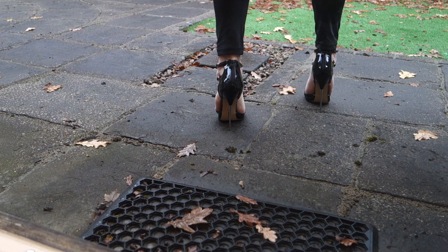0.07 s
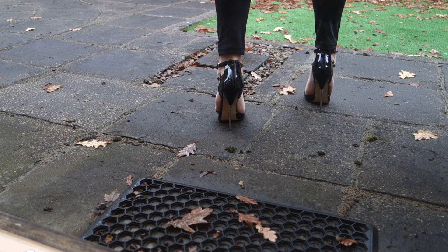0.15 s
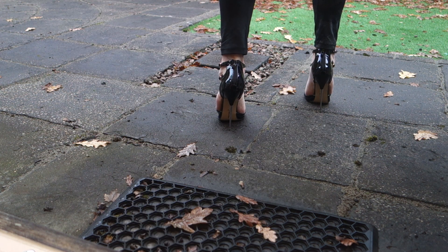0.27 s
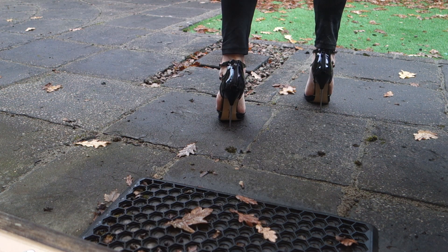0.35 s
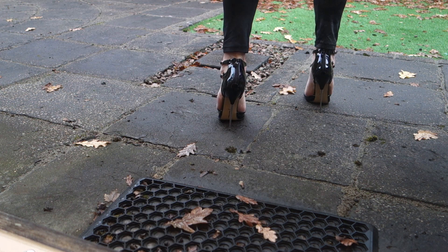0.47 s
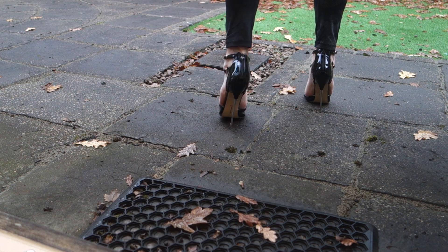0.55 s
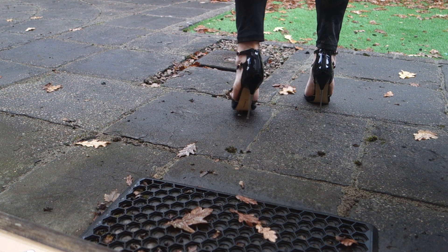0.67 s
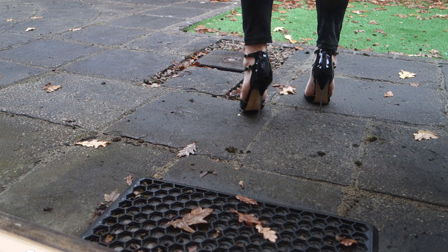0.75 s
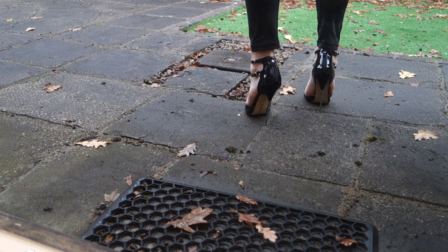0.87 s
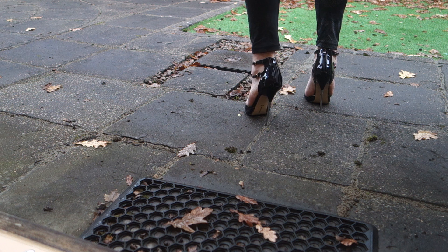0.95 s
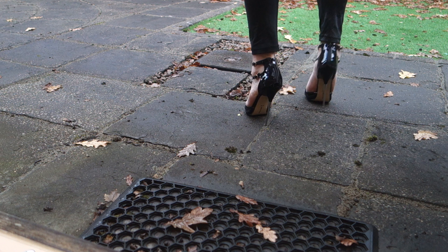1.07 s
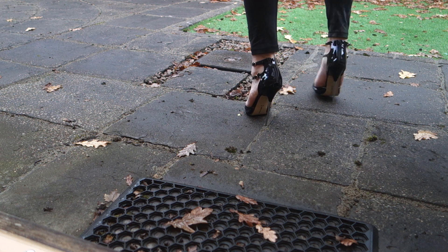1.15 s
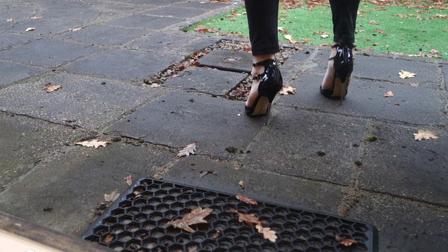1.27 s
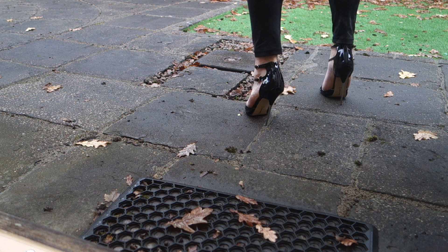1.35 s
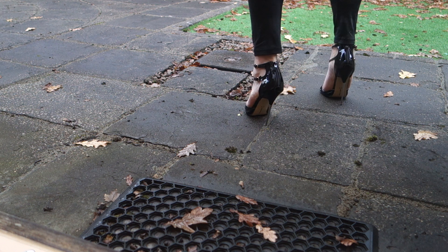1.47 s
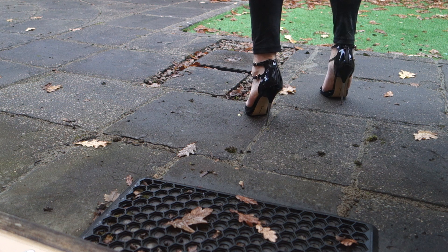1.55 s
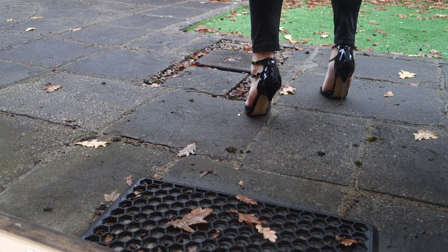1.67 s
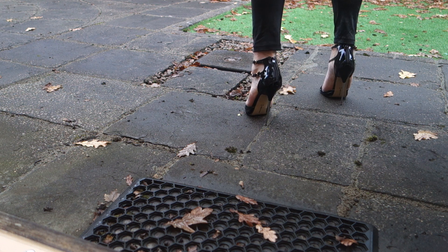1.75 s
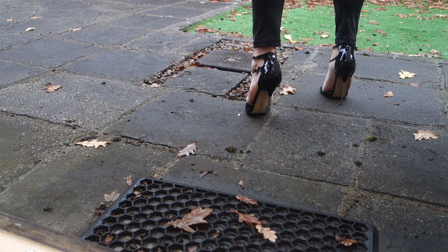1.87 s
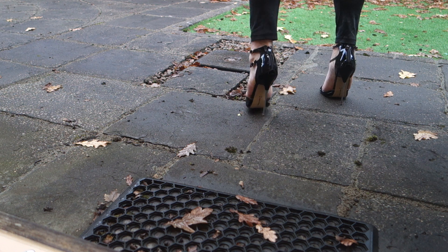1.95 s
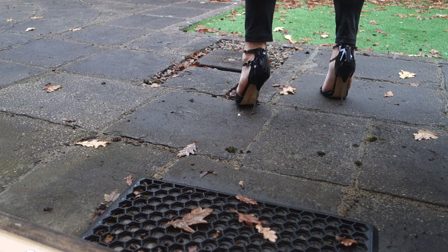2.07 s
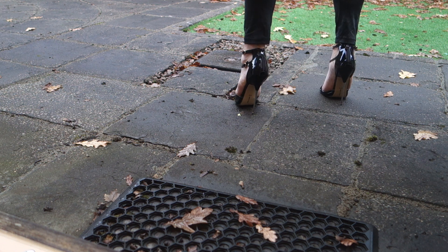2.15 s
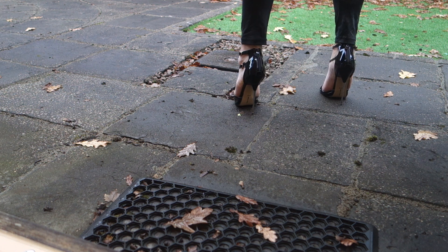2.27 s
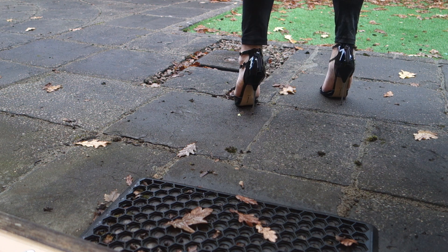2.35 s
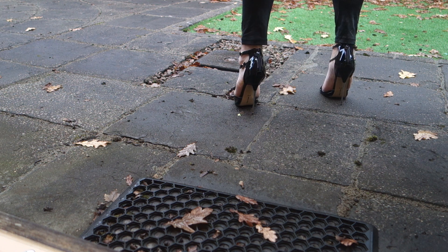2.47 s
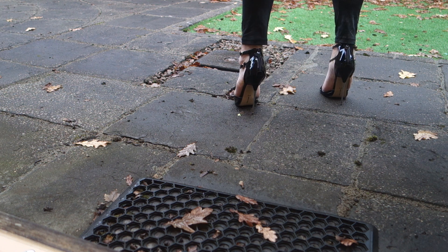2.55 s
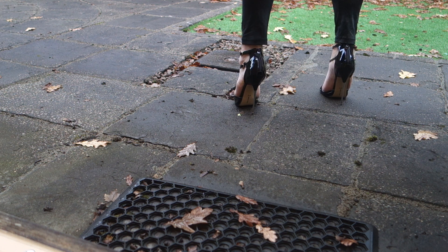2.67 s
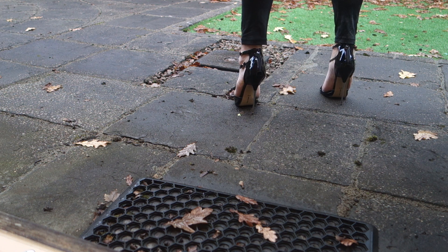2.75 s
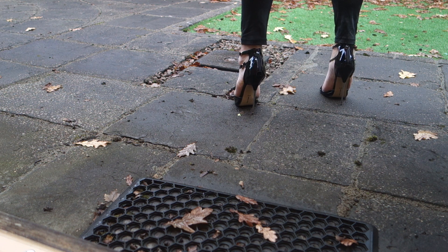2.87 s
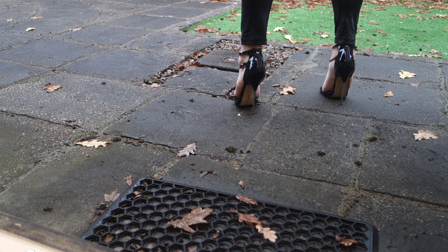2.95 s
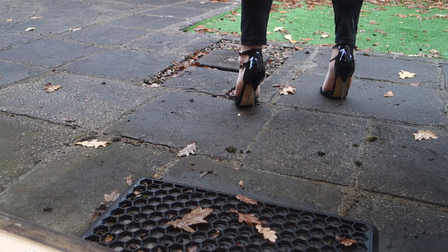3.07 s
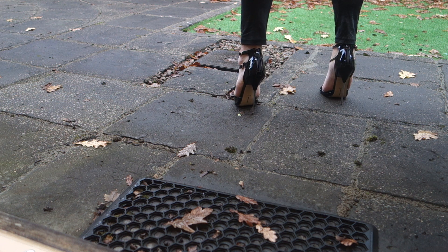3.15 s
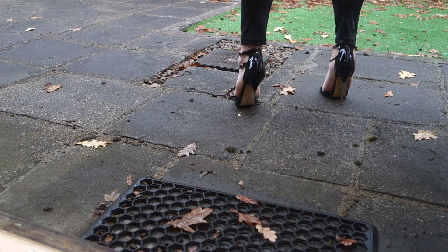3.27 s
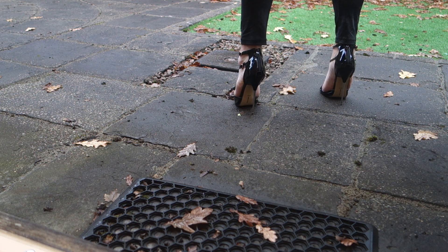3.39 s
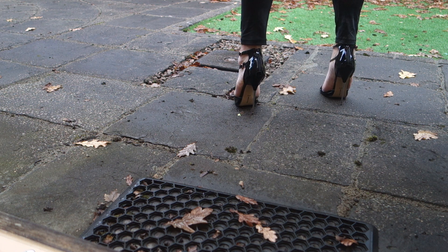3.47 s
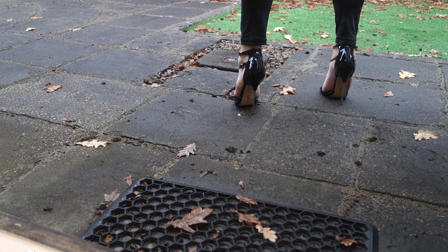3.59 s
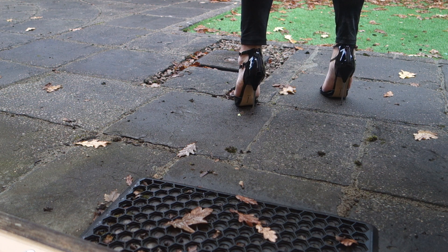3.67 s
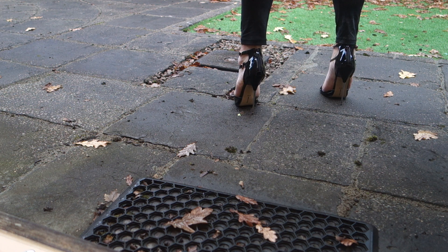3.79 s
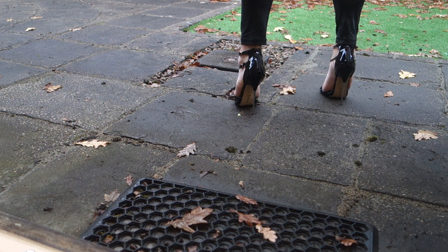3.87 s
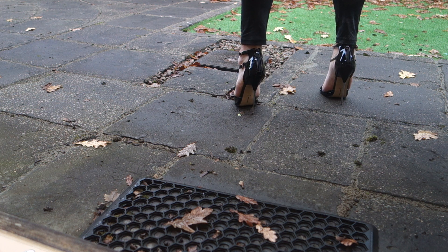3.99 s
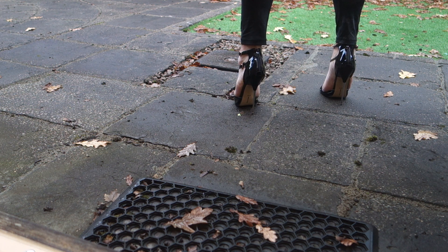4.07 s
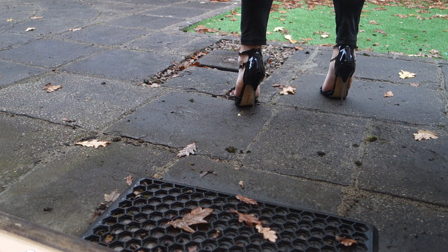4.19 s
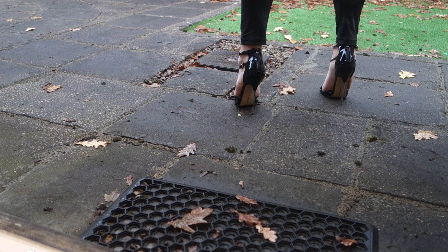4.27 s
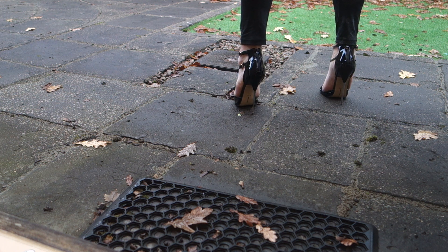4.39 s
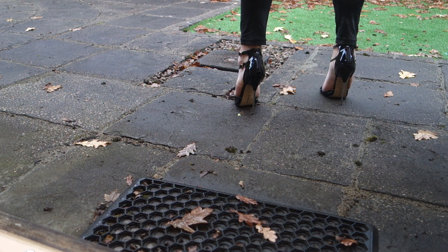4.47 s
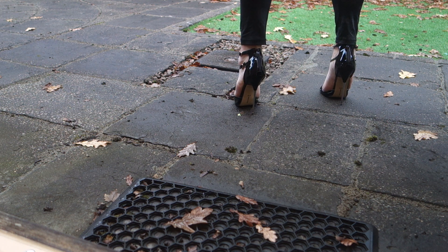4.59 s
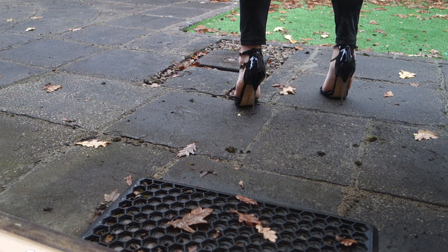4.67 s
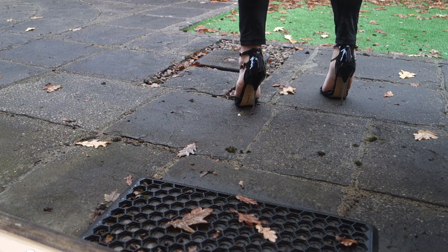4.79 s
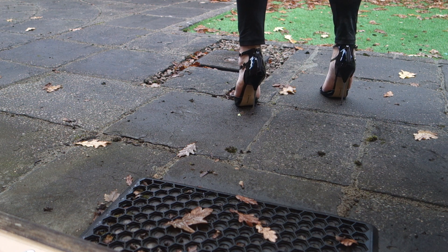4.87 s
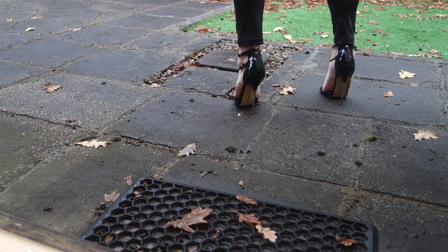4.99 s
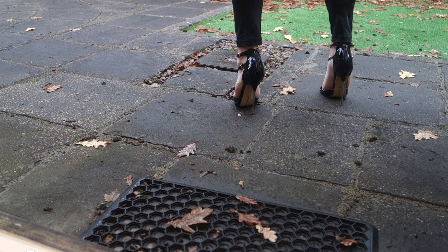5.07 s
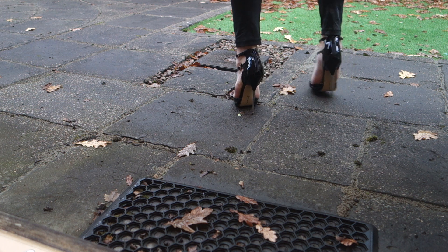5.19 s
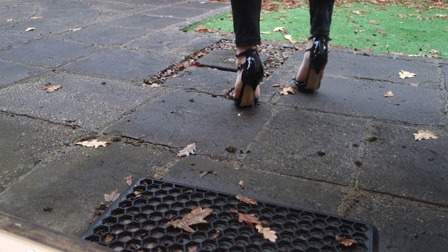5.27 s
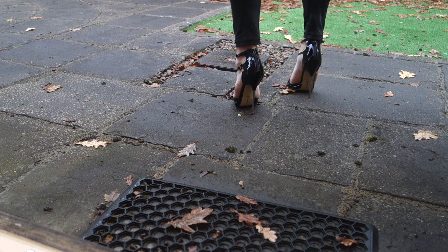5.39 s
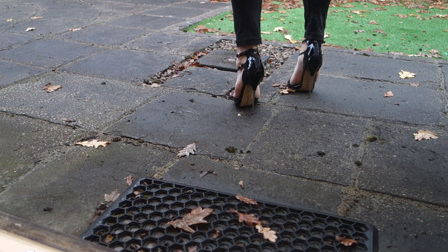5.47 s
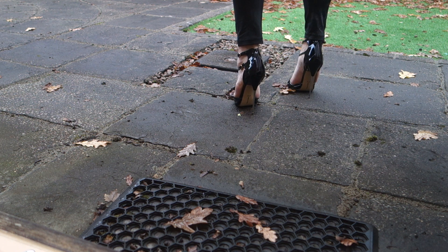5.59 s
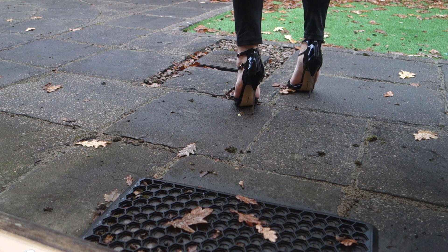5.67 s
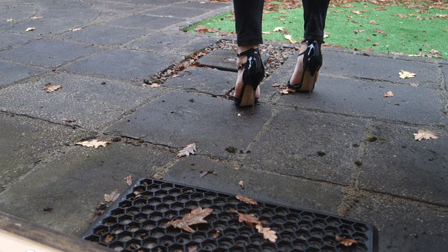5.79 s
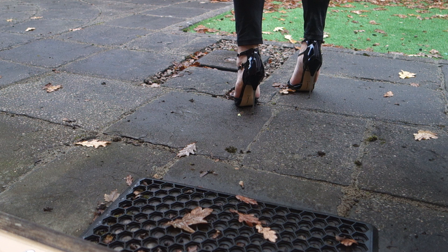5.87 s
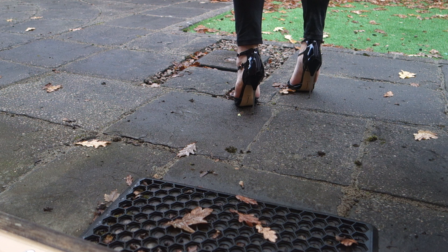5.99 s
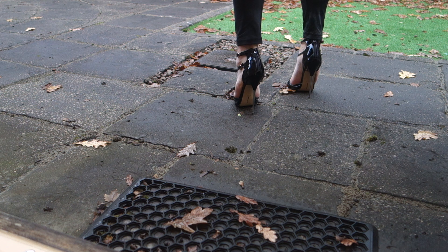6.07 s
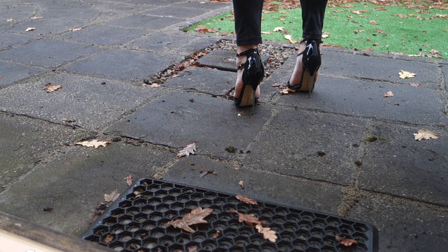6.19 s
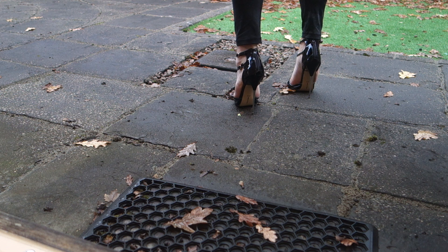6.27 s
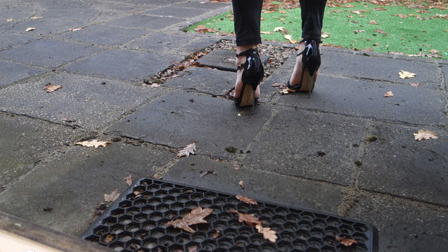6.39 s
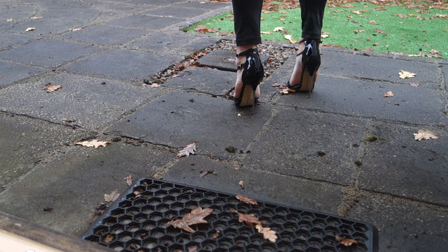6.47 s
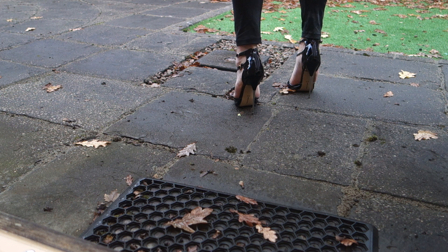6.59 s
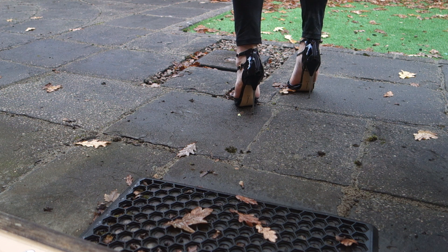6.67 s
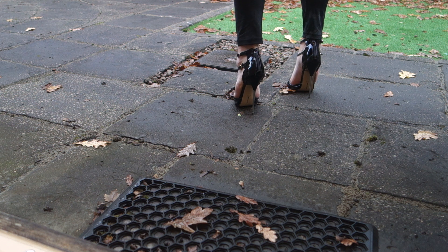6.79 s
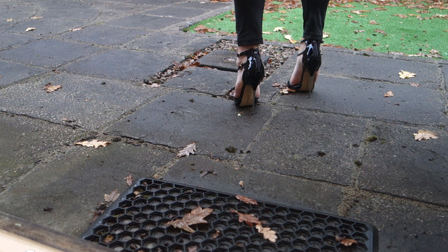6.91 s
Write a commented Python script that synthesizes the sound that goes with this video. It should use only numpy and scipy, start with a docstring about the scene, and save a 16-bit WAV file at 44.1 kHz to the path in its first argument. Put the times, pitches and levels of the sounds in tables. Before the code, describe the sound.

Stiletto heels shuffle, click and scrape on gritty concrete slabs in a walled yard, pause over faint traffic murmur, then step again briefly.

```python
"""Stiletto heels on gritty slabs

Stiletto heels shift about on concrete slabs in a walled yard, a little way from the microphone.
Heel tips and shanks rattle as short modes, soles slap, grit snaps and scrapes as filtered grains;
the walls throw it all back through sparse decaying echo taps. Shaped noise makes the distant traffic
murmur, under a wavering hum, a fuzzy drone and soft thumps; small far birds whistle in gliding tones."""
import sys
import numpy as np
from scipy import signal
from scipy.fft import rfft, irfft
from scipy.io import wavfile
from scipy.ndimage import uniform_filter1d

SR = 44100
rng = np.random.default_rng(int(sys.argv[2]) if len(sys.argv) > 2 else 0)


def file_out(sig):
    """Save sig as 16-bit WAV at sys.argv[1]."""
    # one column per channel
    cols = np.atleast_2d(sig).T
    # limit, then scale
    lim = np.clip(cols, -1, 1)
    pcm = np.round(lim * 32767).astype(np.int16)
    wavfile.write(sys.argv[1], SR, pcm)


N = 306054
CONTACT_MS = 3.83  # how long a direct blow rattles


def amp(db):
    """Decibels to gain."""
    return 10 ** (np.asarray(db) / 20)


def evened(x):
    """Scales to rms 1."""
    return x / np.sqrt(np.mean(x ** 2) + 1e-20)


def peaked(x):
    """Scales to peak 1."""
    return x / (abs(x).max() + 1e-12)


def levelled(x):
    """Scales a short sound to the energy of rms 1 over two and a half milliseconds."""
    return x * np.sqrt(SR / 400) / np.linalg.norm(x)


def read_curve(points, hz):
    """Reads a curve of values over pitch, interpolated on a log-frequency axis."""
    point_hz, value = np.transpose(points)
    return np.interp(np.log(hz + 1), np.log(point_hz + 1), value)


def add(mix, start_s, sound):
    """Mixes a sound in at start_s, cutting what runs past the end."""
    part = mix[..., max(round(start_s * SR), 0):][..., :sound.shape[-1]]
    part += sound[..., :part.shape[-1]]


def placed(sound, pan_db):
    """Leans a sound to the left (positive) or right by a level difference between the ports."""
    return sound * amp([[pan_db / 2], [-pan_db / 2]])


def resonate(x, hz, width_hz):
    """A resonance of gain 1: shifts hz down to zero, smooths, and shifts back."""
    turn = np.exp(2j * np.pi * np.cumsum(hz * np.ones(len(x))) / SR)
    decay = np.exp(-np.pi * width_hz / SR)
    smooth = signal.lfilter([1 - decay], [1, -decay], x / turn)
    return 2 * (turn * smooth).real


def treble(x):
    """Keeps the fizz above 6 kHz."""
    return signal.sosfilt(signal.butter(4, 6000, "high", fs=SR, output="sos"), x)


def ports(z, other, likeness, hz):
    """Spectra at two microphone ports: partly alike, the left one a little late."""
    lag_s = 1.5 / SR
    same = np.clip(read_curve(likeness, hz), 0, 1)[:, None]
    left = z * np.exp(-2j * np.pi * hz * lag_s)[:, None]
    right = same * z + np.sqrt(1 - same ** 2) * other
    return np.array([left, right])


def murmur():
    """Far traffic and microphone hiss: random spectra with slight drifting patches."""
    # murmur colour before levelling: pitch_hz, relative_level_db (per Hz)
    colour = [(12, -31), (20, -7), (42, -10.5), (70, 1), (184, -4.5), (248, -2.5), (510, -6), (722, -10),
              (969, -6.5), (1230, -12.5), (1570, -13.5), (2540, -22), (2830, -26), (10500, -28.5),
              (12000, -38), (15600, -87), (22000, -120)]
    # how alike left and right are: pitch_hz, likeness (0 to 1)
    likeness = [(60, 0.98), (140, 0.98), (350, 0.89), (840, 0.75), (2030, 0.39), (4880, 0.032),
                (11800, 0.29)]
    level_db, patchy_db = -52.5, 0.7
    frames, hz = N // 256 + 5, np.fft.rfftfreq(1024, 1 / SR)
    a, b, c, d, patches = rng.standard_normal((frames, 513, 5)).T
    # smooth over 10 bands and 20 frames
    patches = evened(uniform_filter1d(uniform_filter1d(patches, 10, 0), 20, 1))
    gain_db = read_curve(colour, hz)[:, None] + patchy_db * patches
    z = ports(a + 1j * b, c + 1j * d, likeness, hz) * amp(gain_db)
    sound = signal.istft(z, nperseg=1024, noverlap=768)[1][:, :N]
    return amp(level_db) * evened(sound)


def low_hum():
    """A sine hum that wavers in level and sinks a little in pitch."""
    # hum envelope: time_s, level_db (rms)
    levels = [(0.0, -72), (1.25, -90), (1.47, -62), (1.59, -88), (1.68, -59.5), (3.84, -57), (4.1, -83),
              (4.18, -60), (4.52, -53.5), (4.89, -66), (5.53, -69), (5.7, -51), (6.01, -74), (6.11, -52),
              (6.47, -72), (6.57, -57.5), (6.88, -59), (6.94, -63)]
    start_hz, sag_hz_per_s = 59.2, 0.42
    t = np.arange(N) / SR
    hz = start_hz - sag_hz_per_s * t
    tone = np.sin(2 * np.pi * np.cumsum(hz) / SR)
    return np.sqrt(2) * amp(np.interp(t, *np.transpose(levels))) * tone


def fuzzy_drone():
    """A faint higher drone: noise through a resonance only 3 Hz wide."""
    # drone envelope: time_s, level_db (rms)
    levels = [(0, -61), (2.3, -62), (2.7, -64.5), (3.8, -64), (4.1, -72), (4.5, -62), (5.3, -62),
              (5.6, -60), (6.94, -71)]
    level_db = np.interp(np.arange(N) / SR, *np.transpose(levels))
    return amp(level_db) * evened(resonate(rng.standard_normal(N), 236.5, 3.0))


def soft_thumps():
    """Low sine puffs with a rounded onset and an exponential decay."""
    # thumps: start_s, decay_start_level_db, pitch_hz, t60_s
    puffs = [(1.69, -29, 87.7, 0.052), (6.092, -32.5, 86.5, 0.12), (6.136, -32, 47.4, 0.085)]
    rise_s = 0.016
    out = np.zeros(N)
    t = np.arange(SR // 4) / SR
    for start_s, level_db, hz, t60_s in puffs:
        shape = amp(level_db - 60 * t / t60_s) * (1 - np.exp(-t / rise_s))
        add(out, start_s, shape * np.sin(2 * np.pi * hz * t))
    return out


def birds():
    """Thin whistles that glide to a resting pitch and fade, slightly blurred by distance."""
    # far bird notes: start_s, length_s, first_pitch_hz, last_pitch_hz, level_db (before rise and fade)
    notes = [(.725, 0.15, 5440, 5100, -65), (2.61, 0.23, 6760, 6630, -68), (2.815, 0.19, 6750, 6510, -69),
             (2.998, .13, 6750, 5800, -75), (3.115, .08, 8580, 8500, -65), (4.79, 0.27, 4340, 4860, -70),
             (6.266, 0.21, 5240, 4680, -62.5), (6.47, 0.16, 4460, 4330, -63.5),
             (6.681, 0.13, 7920, 7750, -63)]
    rise_s, fade_db = 0.025, -13  # the fade is reached at the end of the note
    glide_share = 0.24  # time constant of the glide, as a share of the note
    out = np.zeros((2, N))
    for start_s, length_s, first_hz, last_hz, level_db in notes:
        t = np.arange(0, length_s, 1 / SR)
        hz = last_hz + (first_hz - last_hz) * np.exp(-t / (glide_share * length_s))
        blur = evened(resonate(rng.standard_normal(len(t)), hz, 150))
        note = evened(np.cos(2 * np.pi * np.cumsum(hz) / SR) + 0.6 * blur)
        shape = np.minimum(t / rise_s, 1) * amp(level_db + fade_db * t / length_s)
        shape = shape * signal.windows.tukey(len(t), 0.2)
        add(out, start_s, placed(shape * note, pan_db=5.0))
    return out


def echoes(x):
    """A few wall echoes, then sparse taps of random sign, each band dying at its own speed."""
    # decay of the yard: pitch_hz, t60_s
    decay = [(200, 0.41), (530, 0.36), (1390, 0.53), (3680, 0.38), (9700, 0.35)]
    # first wall echoes: delay_ms, level_db
    walls = [(5.5, -16.5), (9.5, -20), (13, -25), (21, -22)]
    # left-right likeness of the echoes: pitch_hz, likeness (clipped to 1)
    likeness = [(170, 1.5), (500, 0.86), (1420, 0.82), (4090, 0.39), (11800, 0.086)]
    tail_db = -3.5
    far_db, far_t60_s = -22, 1.61  # a faint, slower echo from farther houses
    taps = np.zeros((2, SR))
    at = np.arange(300, SR - 20, 20)
    at = at + rng.integers(0, 20, (2, len(at)))  # one tap somewhere in every 20 samples
    np.put_along_axis(taps, at, rng.choice([-1., 1.], at.shape), 1)
    hz, t, z = signal.stft(taps, SR, nperseg=256)
    near_decay = amp(-60 * t / read_curve(decay, hz)[:, None])
    far_decay = amp(far_db - 60 * t / far_t60_s)
    z = ports(z[0], z[1], likeness, hz) * (near_decay + far_decay)
    tail = signal.istft(z, SR, nperseg=256)[1]
    tail = amp(tail_db) * tail / np.linalg.norm(tail[0])
    for delay_ms, level_db in walls:
        delay = round(delay_ms * rng.uniform(0.85, 1.15) * SR / 1000)
        tail[:, delay] += amp(level_db) * np.array([0.9, 1])
    return signal.fftconvolve(x[None], tail, axes=1)[:, :N]


def yard(x):
    """Three sets of random echo taps, crossfaded in steady rotation at constant power, keep the tail even."""
    handovers_per_s = 9  # from one set to the next
    turn = np.pi * handovers_per_s * np.arange(N) / SR
    out = np.zeros((2, N))
    for k in range(3):
        weight = np.sqrt(2 / 3) * np.cos(turn / 3 + k * np.pi / 3)
        out += echoes(x * weight)
    return out


def drag(fastest_s, rise_s, fall_s, hiss_db, rasp_db, rasp_hz):
    """Uneven grains under the sliding sole: a hiss, and a rasp in the arch of the shoe."""
    # colour of the hiss before levelling: pitch_hz, relative_level_db (per Hz)
    grit_colour = [(1180, -65), (2000, -32), (2490, -7), (2860, -17), (3200, 5), (5710, -2), (7070, -0.5),
                   (11000, 4.5), (14300, -35), (22000, -120)]
    grains_per_s, rasp_width_hz = 1400, 750
    hiss_drop_db, rasp_drop_db = 33, 26  # fall in level over one rise_s or fall_s
    t = np.arange(SR * 3 // 10) / SR - 0.1
    slow = np.where(t < 0, -t / rise_s, t / fall_s)
    grains = amp(4.2 * np.minimum(rng.exponential(1, len(t)), 3.5))
    grains = grains * (rng.random(len(t)) < grains_per_s / SR)
    grains = grains * rng.standard_normal(len(t))
    colour_db = read_curve(grit_colour, np.fft.rfftfreq(len(t), 1 / SR))
    hiss = irfft(rfft(grains) * amp(colour_db), len(t))
    rasp = resonate(resonate(grains, rasp_hz, rasp_width_hz), rasp_hz, rasp_width_hz)
    rasp = resonate(rasp, rasp_hz, 2100)
    sound = amp(hiss_db - hiss_drop_db * slow) * evened(hiss)
    sound += amp(rasp_db - rasp_drop_db * slow) * evened(rasp)
    sound = sound * signal.windows.tukey(len(t), 0.1)
    heard = fastest_s + t >= 0
    return fastest_s + t[heard][0], sound[heard]


def crack(level_db, hz, fizz_db):
    """A grain snaps: one clean tick and a millisecond of chatter, with a broad pitch and fizz."""
    ms = np.arange(512) * 1000 / SR
    chatter = rng.standard_normal(len(ms)) * np.exp(-(ms / 1.1) ** 2)
    snap = (ms == 0) + 0.2 * chatter
    pitched = resonate(resonate(snap, hz, 2260), hz, 12000)
    return amp(level_db) * peaked(pitched) + amp(fizz_db) * levelled(treble(snap))


def rattle(hz, shape, rough):
    """A mode driven as long as the contact lasts; grit makes its swing uneven."""
    t = np.arange(len(shape)) / SR
    tone = np.sin(2 * np.pi * hz * t)
    grit = evened(resonate(resonate(rng.standard_normal(len(t)), hz, 2500), hz, 6200))
    return shape * (tone + rough * grit)


def blow(tip_db, tip_hz, sole_db, sole_hz, shank_db, shank_hz, contact_ms):
    """The contact rattles heel tip and shank for a few milliseconds; the sole slaps just after."""
    full_fizz_db, fizz_follow = -25, 0.49  # fizz at 0 dB tip level; fizz change per dB of tip level
    ms = np.arange(1024) * 1000 / SR
    shape = np.minimum(ms / 0.6, 1) * np.exp(-(ms / contact_ms) ** 3)
    tip = rattle(tip_hz, shape, rough=1.1)
    shank = rattle(shank_hz, shape, rough=0.78)
    fizz = treble(shape * rng.standard_normal(len(ms)))
    late_ms = np.maximum(ms - 0.8, 0)
    slap = np.sin(2 * np.pi * sole_hz * late_ms / 1000) * late_ms * np.exp(-(late_ms / 2.2) ** 2)
    # a shorter contact is raised to keep its energy
    sound = amp(tip_db) * peaked(tip) * np.sqrt(CONTACT_MS / contact_ms)
    sound += amp(shank_db) * levelled(shank)
    sound += amp(full_fizz_db + fizz_follow * tip_db) * levelled(fizz)
    sound += amp(sole_db) * levelled(slap)
    return sound


def shoes():
    """Blows, cracks and drags, direct and thrown back by the yard."""
    # heel and sole blows: start_s, tip_level_db, tip_pitch_hz, sole_level_db, sole_pitch_hz,
    # shank_level_db, shank_pitch_hz, echo_send_db
    blows = [(0.0024, -50, 4230, -22, 426, -19.5, 1200, 7), (0.0191, -23.5, 2555, -31, 264, -28, 1350, 10),
             (0.4756, -28, 4180, -29, 350, -27, 883, 9.5), (0.4918, -14, 4240, -20.5, 280, -17.5, 1600, -5),
             (0.5246, -17.5, 3700, -12, 501, -45, 1760, -2),
             (0.8821, -18.5, 3510, -21.5, 553, -30, 2050, -1), (0.943, -29, 3700, -30, 410, -32, 1950, 0.5),
             (0.9555, -29, 3630, -41, 553, -50, 2230, -9), (1.0435, -35, 3820, -36.5, 630, -36, 2030, 6.5),
             (1.2961, -21, 3740, -23.5, 316, -28, 1060, 1.5),
             (1.3096, -20.5, 3240, -23.5, 596, -29.5, 1650, 3.5),
             (1.4084, -24.5, 5550, -36.5, 590, -29.5, 1020, 5.5),
             (1.4386, -15.5, 3410, -22.5, 623, -20, 1805, -3.5),
             (1.4602, -23.5, 3520, -37, 600, -32, 1500, 2.5), (1.9202, -35, 2950, -40, 553, -39, 1350, 1),
             (1.9643, -28, 3420, -42, 538, -43, 970, -1.5), (2.134, -15, 3470, -21, 340, -25, 1890, -4),
             (2.1544, -47, 3600, -38.5, 610, -55, 2140, 13.5),
             (2.2205, -33, 3620, -31, 313, -33.5, 1890, -2.5),
             (5.0537, -25.5, 4370, -27, 660, -28, 935, 1.5),
             (5.0736, -15.5, 4640, -30.5, 398, -27, 1940, 4), (5.0834, -47, 3620, -36, 623, -32, 2350, 4.5),
             (5.0972, -35, 5000, -42, 606, -32.5, 2020, 4.5),
             (5.3904, -35, 3300, -39.5, 338, -32.5, 2720, 12), (5.4133, -37, 3780, -28, 251, -47, 2750, -5),
             (5.4281, -18, 3480, -29, 630, -28, 950, -2.5),
             (5.5641, -28, 4450, -38, 850, -40.5, 1800, -1.5)]
    # grains of grit cracking under the shoes: start_s, peak_level_db, pitch_hz, fizz_level_db
    cracks = [(0.101, -23.5, 2530, -42), (0.2797, -54, 4600, -46.5), (0.412, -36, 5500, -36.5),
              (0.42, -34.5, 5030, -35.5), (0.6074, -49, 3770, -32.5), (0.9083, -35, 3000, -28),
              (0.908, -20.5, 3830, -37), (0.979, -18, 6200, -37), (1.0804, -31, 3300, -40),
              (1.087, -25, 5490, -32), (1.1004, -27, 3950, -48), (1.119, -25, 5500, -45),
              (1.132, -15, 4400, -35), (1.3958, -20, 3770, -29), (1.418, -9, 5100, -31),
              (1.5083, -21.5, 4440, -54), (1.5384, -32, 3710, -40), (1.6509, -33.5, 5140, -44),
              (1.6608, -30, 4140, -37), (1.843, -43, 3000, -50), (1.8531, -35, 2470, -38.5),
              (1.8706, -28.5, 5770, -34), (1.9408, -45, 3620, -43), (2.0763, -37, 3300, -58),
              (2.101, -35, 3020, -47), (2.204, -22.5, 5550, -28.5), (2.2464, -30, 5600, -31.5),
              (2.253, -24, 5800, -44), (2.261, -39, 5600, -37), (2.2692, -27, 4500, -38),
              (2.2856, -23.5, 3300, -30.5), (2.3, -26, 5600, -43), (2.308, -48, 5000, -45),
              (2.807, -41, 4500, -49), (3.575, -49, 3500, -51), (4.054, -37.5, 5570, -42.5),
              (4.1822, -39.5, 6240, -68), (4.3973, -46, 6020, -66), (4.9838, -46, 4500, -48),
              (5.0205, -36.5, 3500, -42.5), (5.1304, -25, 2510, -31.5), (5.226, -33, 4000, -39.5),
              (5.356, -55, 6000, -48), (5.4012, -12, 3500, -28), (5.4061, -10.5, 3460, -33),
              (5.501, -22, 4200, -26), (5.566, -20, 4200, -42), (5.6527, -21.5, 4030, -32.5),
              (5.726, -39, 4030, -67), (6.0546, -45, 4000, -47), (6.1446, -38.5, 3670, -47),
              (6.258, -56, 5300, -50.5), (6.7412, -27, 6500, -37.5)]
    # soles dragging over the slabs: fastest_s, speeding_up_s, slowing_down_s, hiss_level_db,
    # rasp_level_db, rasp_pitch_hz
    drags = [(.004, 0.012, 0.093, -71, -23, 1340), (0.519, 0.035, 0.13, -34.5, -37, 1590),
             (.91, 0.013, 0.018, -46, -46, 2060), (0.957, 0.027, 0.02, -39, -42, 1950),
             (1.135, 0.088, 0.042, -34, -44.5, 1880), (1.305, 0.024, 0.12, -40, -34.5, 1510),
             (1.36, 0.031, 0.18, -40, -44, 3600), (1.435, 0.099, 0.1, -37.5, -35, 1840),
             (1.657, 0.026, 0.071, -49.5, -57, 1450), (1.89, .07, 0.18, -47, -56, 1520),
             (1.968, 0.022, 0.015, -32.5, -68, 1990), (2.14, .006, .1, -59, -45, 1750),
             (2.29, 0.15, 0.043, -43.5, -51, 3460), (2.311, 0.12, 0.32, -73, -53.5, 1860),
             (5.08, 0.012, 0.17, -39, -28, 2090), (5.411, 0.022, 0.04, -34, -27.5, 3650),
             (5.659, 0.054, 0.037, -46.5, -60, 1520)]
    blow_pan_db, crack_pan_db = 1.4, -0.5
    crack_send_db, drag_send_db = -3, -6.0
    scatter_ms = 1.7  # the walls hear a blow from all sides, blurred in pitch like so short a contact
    left_lag_s = 28.6e-6  # the left port hears the direct shoes this much later
    near, sent = np.zeros((2, N)), np.zeros(N)
    for start_s, *force, echo_db in blows:
        add(near, start_s, placed(blow(*force, CONTACT_MS), blow_pan_db))
        add(sent, start_s, amp(echo_db) * blow(*force, scatter_ms))
    for start_s, *force in cracks:
        sound = crack(*force)
        add(near, start_s, placed(sound, crack_pan_db))
        add(sent, start_s, amp(crack_send_db) * sound)
    for row in drags:
        start_s, sound = drag(*row)
        other_grains = drag(*row)[1]
        # the ports hear partly other grains
        add(near, start_s, np.array([sound, 0.8 * sound + 0.6 * other_grains]))
        add(sent, start_s, amp(drag_send_db) * sound)
    hz = np.fft.rfftfreq(N, 1 / SR)
    near[0] = irfft(rfft(near[0]) * np.exp(-2j * np.pi * hz * left_lag_s), N)
    # a small shoe radiates no deep bass
    no_bass = signal.butter(4, 135, "high", fs=SR, output="sos")
    return signal.sosfilt(no_bass, near + yard(sent))


def scene():
    """Everything that reaches the microphone."""
    return murmur() + low_hum() + fuzzy_drone() + soft_thumps() + birds() + shoes()


def record(dry):
    """The band limit: a steep low-pass at 11.1 kHz."""
    low_pass = signal.firwin(501, 11100, window=("kaiser", 6), fs=SR)
    return signal.oaconvolve(dry, low_pass[None], "same")


dry = scene()
out = record(dry)
file_out(out)
```